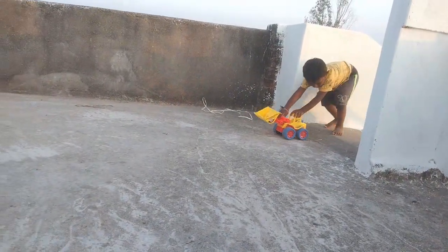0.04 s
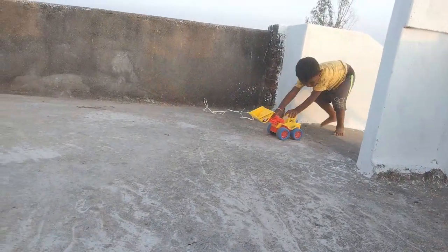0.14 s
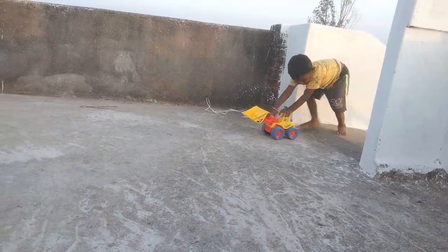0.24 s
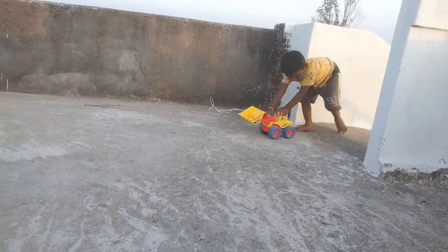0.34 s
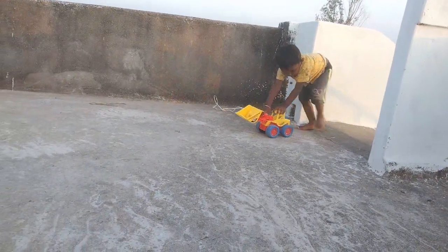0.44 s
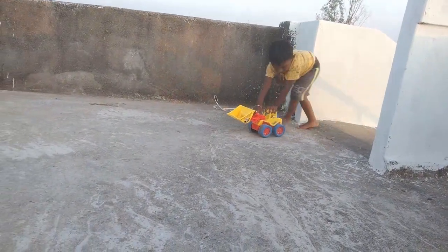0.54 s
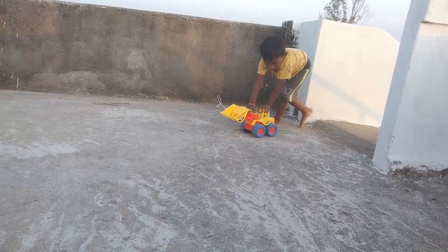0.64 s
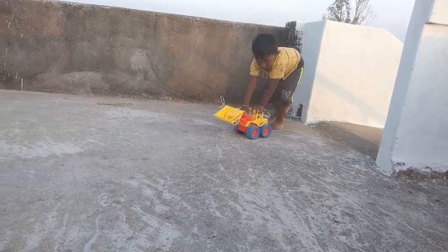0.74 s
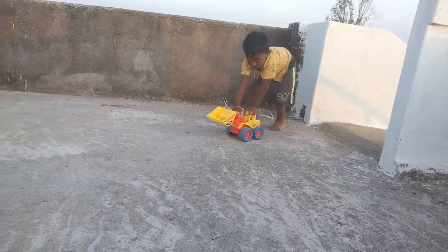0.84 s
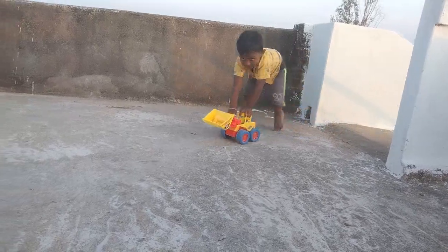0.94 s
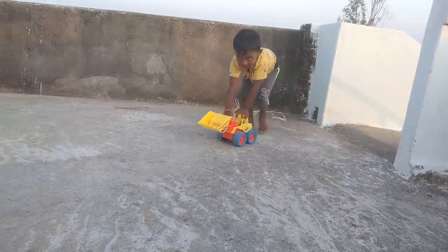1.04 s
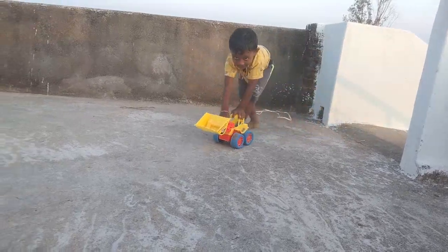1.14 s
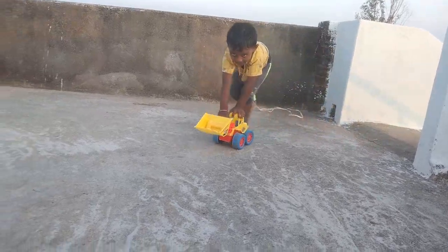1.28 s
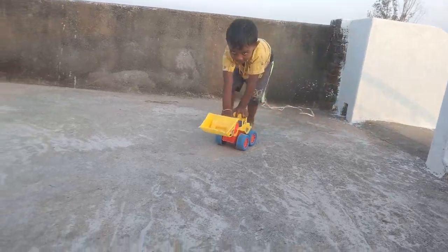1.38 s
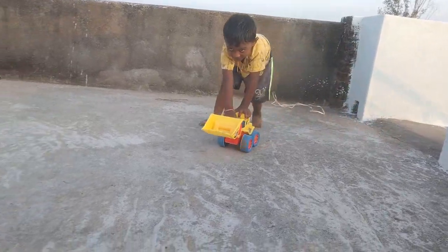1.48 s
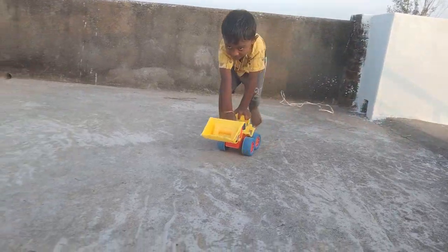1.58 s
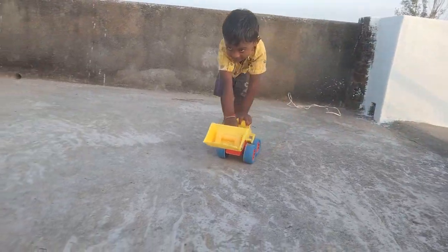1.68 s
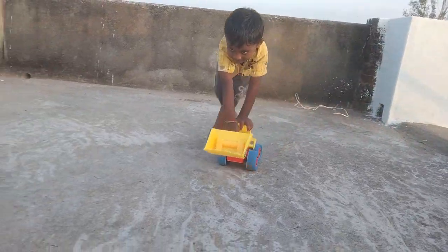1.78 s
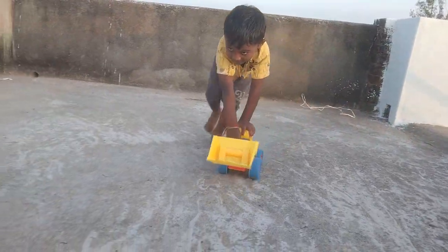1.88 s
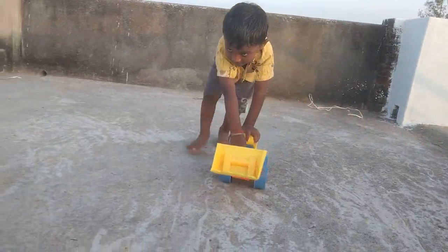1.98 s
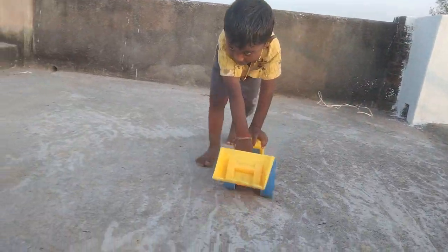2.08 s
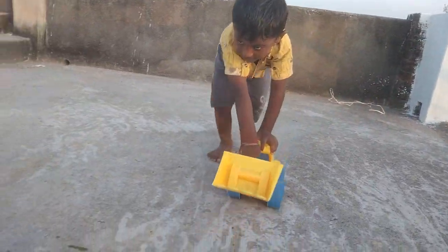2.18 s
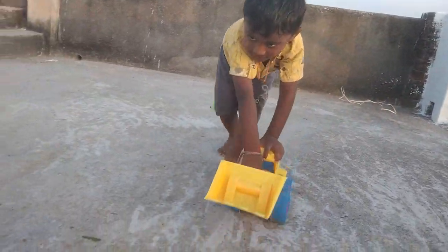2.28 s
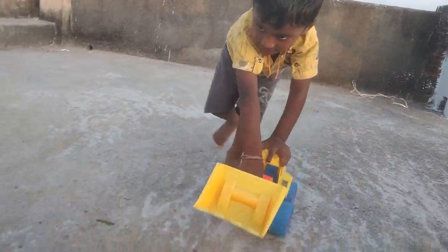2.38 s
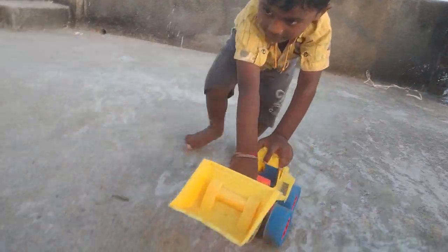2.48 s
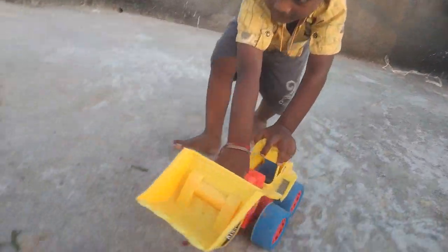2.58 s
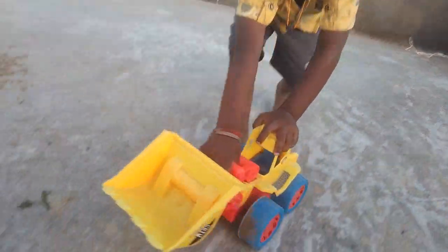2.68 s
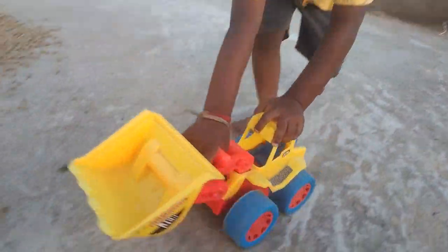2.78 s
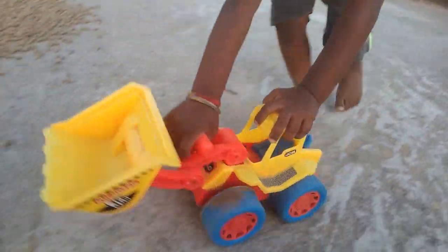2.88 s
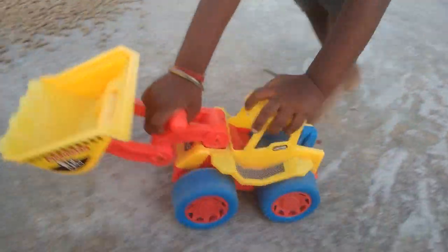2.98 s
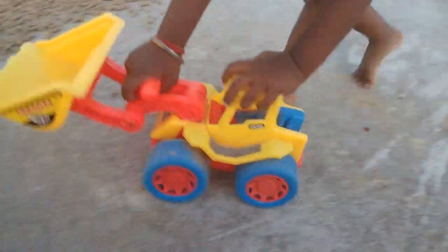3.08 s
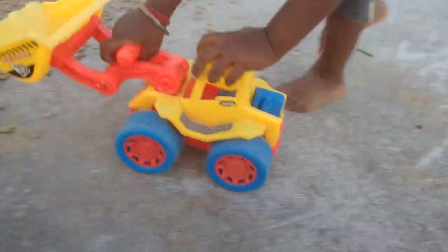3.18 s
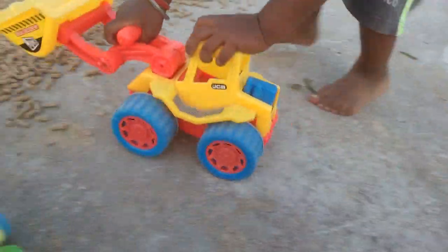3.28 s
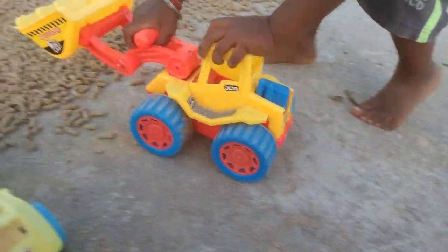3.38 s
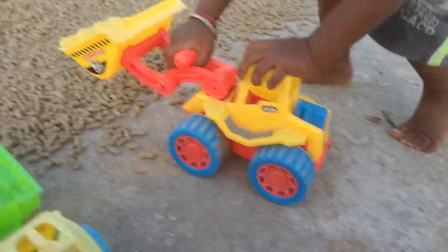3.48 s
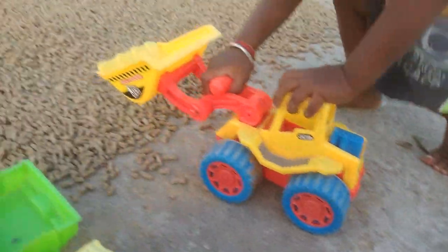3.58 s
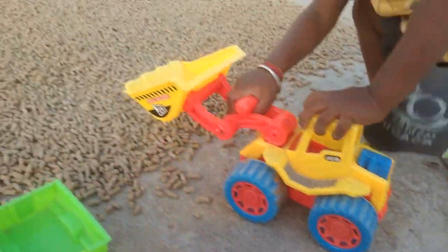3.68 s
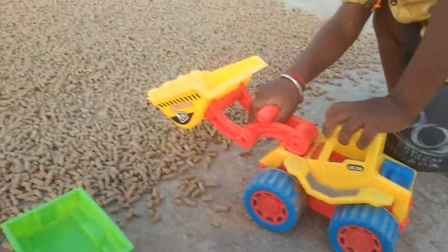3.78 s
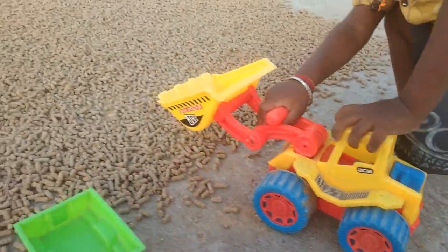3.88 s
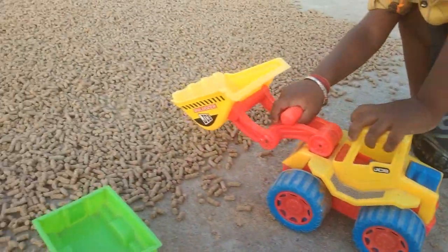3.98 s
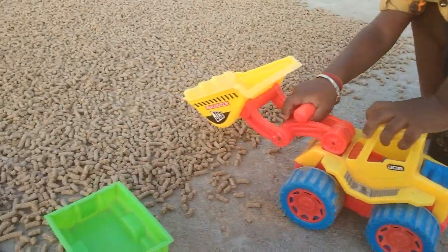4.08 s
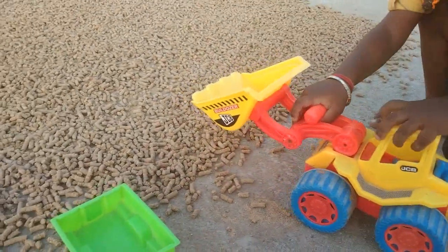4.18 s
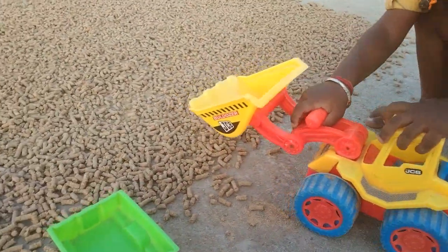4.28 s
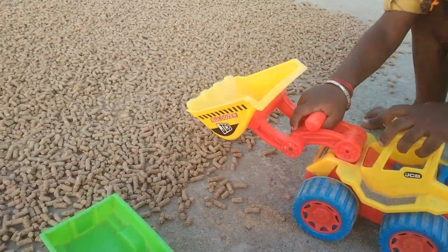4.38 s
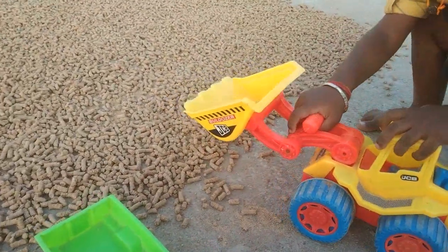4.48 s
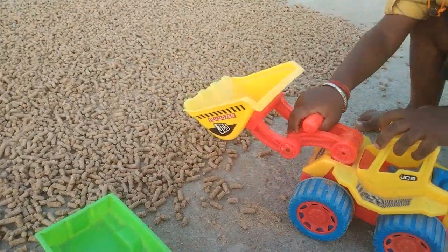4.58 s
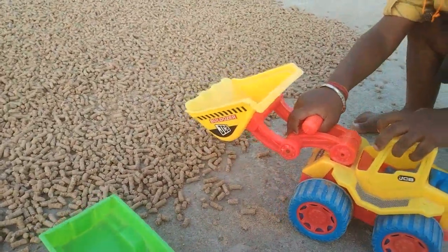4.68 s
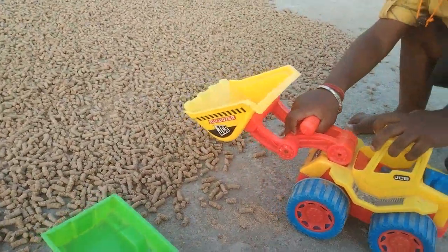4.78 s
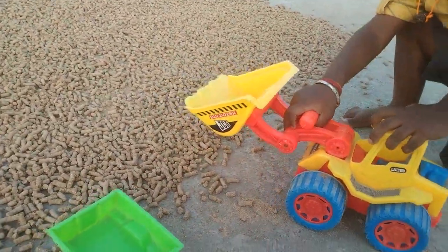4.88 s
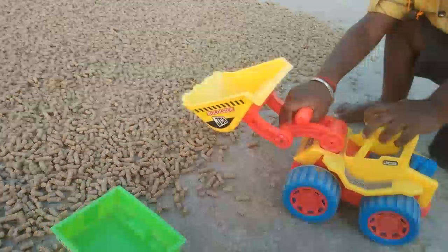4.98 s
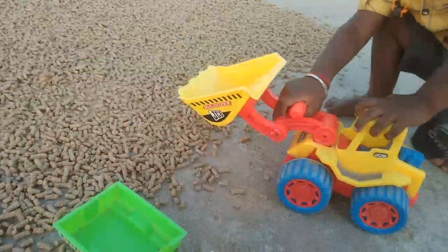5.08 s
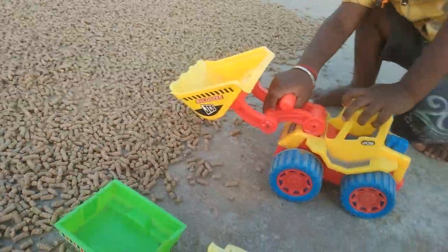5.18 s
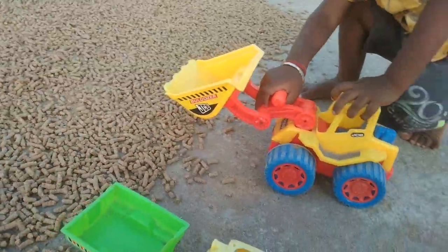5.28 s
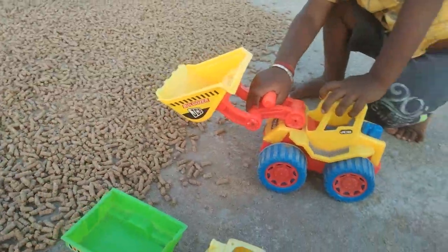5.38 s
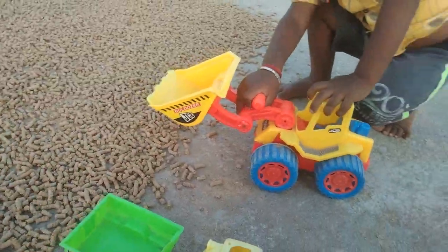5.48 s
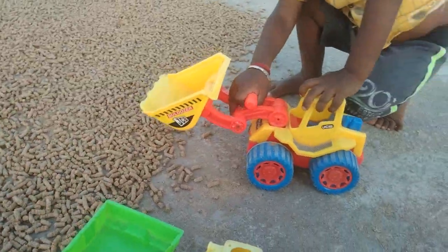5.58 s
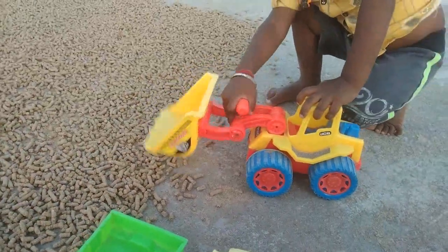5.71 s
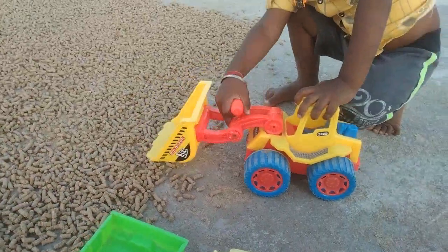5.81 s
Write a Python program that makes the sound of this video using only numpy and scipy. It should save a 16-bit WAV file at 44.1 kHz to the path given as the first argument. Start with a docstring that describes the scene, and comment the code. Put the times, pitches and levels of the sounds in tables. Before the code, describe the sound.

Clattering plastic wheels roll closer across gritty concrete, pass loudly and halt, leaving tiny clicks, sandy scrapes and a low distant rumble.

```python
"""Toy loader on rough concrete

A hollow plastic toy loader is pushed towards a phone on a roof terrace, stops, and creeps on among pellets.
Random bumps ring the modes of the hollow body; grit grains and axle rattles ring the thin wheel shells.
Placed bursts ring the same modes as ticks of joints and pellets and as dull body knocks.
Filtered noise makes sand scuffs and a low town rumble; stick-slip impulses make the bucket arm creak.
A short bounce off the ground and one weak wall echo set the toy on the terrace.
"""
import sys
import numpy as np
from scipy import signal
from scipy.fft import rfft, irfft
from scipy.io import wavfile
from scipy.ndimage import uniform_filter1d

SR = 44100
rng = np.random.default_rng(int(sys.argv[2]) if len(sys.argv) > 2 else 0)


def to_wav(sig):
    """Store sig (one row per channel, or 1-D mono) as 16-bit WAV at the path in sys.argv[1].

    Samples outside -1..1 are clipped; the rate is SR.
    """
    pcm = np.clip(np.atleast_2d(sig), -1, 1) * 32767
    pcm = np.round(pcm).astype(np.int16)
    wavfile.write(sys.argv[1], SR, pcm.T)  # frames by channels


N = 257713

# modes of the hollow body, seen from the front: mode_hz, width_hz, level_db, side_on_gain_db
BODY_MODES = [(143, 88, -17.5, 2.5), (327, 160, -12, 2), (439.5, 100, -3, 3.5), (525.6, 90, -3, 7),
              (601.3, 86.6, 6, -2.5), (691, 80, 4.5, -3), (773, 78, 3, -4), (862.3, 160, 1.5, -3),
              (1014, 170, -6.5, 6), (1278, 286, -3.5, 3), (1410, 78, -10, -5), (2140, 420, -18, 4.5)]
# modes of the thin wheel shells and panels, seen from the front: mode_hz, width_hz, level_db, side_on_gain_db
SHELL_MODES = [(2163, 1200, -1.5, 4.5), (2850, 250, 0, -2.5), (3190, 300, 0.5, 1.5), (3553, 358, 5, -4),
               (4037, 500, -1, 4), (4510, 420, 2, 0), (4960, 530, -5, 8), (5390, 310, 1.5, 1.5),
               (5770, 260, 1.5, -2), (6210, 910, -7, 3), (7520, 260, -6, 4.5), (8700, 110, -6.5, -2.5),
               (10570, 87, -19.5, 1)]
# the toy swings its front to the phone, then passes it broadside: time_s, side_on_share (0-1)
SIDE_ON = [(0, 0.28), (1.1, 0.76), (1.5, 0.49), (2.5, 0.09), (2.85, 0.8), (3.5, 0.97), (5.84, 0.84)]
# the toy rocks, rests and creeps on: time_s, body_rumble_db, scuffing_db
CREEP = [(3.5, -69, -67), (3.6, -69, -59.5), (3.83, -64.5, -62.5), (4.0, -68.5, -62.5), (4.15, -63, -68.5),
         (4.21, -55.5, -80), (4.36, -55.5, -66), (4.44, -63.5, -70), (4.55, -73.5, -74), (4.65, -77, -78.5),
         (4.75, -76, -80.5), (4.84, -71, -77), (4.9, -73, -70), (4.98, -70, -70.5), (5.03, -69, -61),
         (5.15, -63, -61.5), (5.3, -64.5, -56), (5.43, -60, -60.5), (5.65, -61, -69), (5.76, -55, -54.5),
         (5.842, -45, -55)]


def body(uneven, rattles):
    """Bumps in the concrete shake the hollow body; its modes take turns among three wheels' own bumps."""
    bumps_per_s, bump_spread_db = 1200, 0.9
    shared = unit(contacts(bumps_per_s, bump_spread_db)) + 1.1 * rattles
    wheels = []
    for _ in range(3):
        own = unit(contacts(bumps_per_s, bump_spread_db))
        wander_db = 2.3 * walk(50) + 1.6 * walk(4.935)
        wheels.append(undb(wander_db) * (shared + 0.8 * own))
    rung = ground(ring(wheels, BODY_MODES, 1.58, curve(SIDE_ON, column=1)))
    gain = rolling(column=1) + undb(curve(CREEP, column=1))
    return gain * unit(rung * undb(0.5 * uneven))


def grit(uneven, rattles):
    """Dense grains and sparser axle rattles ring the wheel shells, each panel in fits; fine dust hisses above."""
    # spectrum of the dust hiss: pitch_hz, relative_density_db (per Hz)
    dust_colour = [(4120, -27.5), (7000, -10.5), (9560, -18.5), (10800, -18.5), (11900, -25.5),
                   (14900, -19.5), (16000, -22)]
    grains_per_s, grain_spread_db = 2000, 1
    dust_db = -13.5  # against the shells, before the uneven ground moves it
    panels = []
    for _ in range(5):
        grains = unit(contacts(grains_per_s, grain_spread_db))
        wander_db = 2.0 * walk(70) + 2.0 * walk(6.14)
        panels.append(undb(wander_db) * (rattles + grains))
    rung = ground(ring(panels, SHELL_MODES, 3.0, curve(SIDE_ON, column=1)))
    shells = unit(rung * undb(0.8 * uneven))
    dust = unit(colour(rng.standard_normal(N) + 0.54 * rattles, dust_colour))
    return rolling(column=2) * (shells + undb(dust_db + 0.52 * uneven) * dust)


def rolling(column):
    """Gain of a rolling layer: its level, lifted on every ridge that the wheels lurch over."""
    # the toy rolls nearer, passes and brakes; levels between ridges: time_s, body_rumble_db, grit_hiss_db
    levels = [(0.0, -30.5, -37.5), (0.05, -27.5, -42), (0.12, -40, -40.5), (0.3, -40.5, -43.5),
              (0.64, -39.5, -45), (0.83, -36.5, -38), (1.04, -41, -36), (1.17, -31, -33.5),
              (1.25, -35, -36.5), (1.39, -35.5, -36.5), (1.44, -31, -36.5), (1.65, -32, -33),
              (1.89, -34, -33), (1.96, -31.5, -30.5), (2.11, -28, -32), (2.195, -34, -33.5),
              (2.25, -26, -31), (2.42, -26.5, -31.5), (2.684, -23, -25.5), (2.8, -27, -28),
              (2.9, -21.5, -25), (2.983, -17.5, -23), (3.03, -20, -24.5), (3.075, -18.5, -20),
              (3.1, -24, -25.5), (3.125, -22.5, -25), (3.173, -23, -26), (3.273, -20.5, -21.5),
              (3.352, -28.5, -25.5), (3.416, -28.5, -24), (3.51, -39, -43.5), (3.565, -58, -74),
              (3.64, -113, -90)]
    # ridges: start_s, body_rumble_gain_db, grit_hiss_gain_db, hold_s
    ridges = [(0.31, 5, 2, 0.028), (0.663, 7.5, 7.5, 0.032), (0.845, 6, 0, 0.11)]
    rise_s, fall_s = 0.012, 0.14
    t = np.arange(N) / SR
    lift_db = 0
    for row in ridges:
        corners_s = np.cumsum([0, rise_s, row[3], fall_s])
        lift_db = lift_db + row[column] * np.interp(t - row[0], corners_s, [0, 1, 1, 0])
    return undb(curve(levels, column=column) + lift_db)


def axle_rattles():
    """Loose axles knock at random; each knock chatters on as noise that dies away exponentially."""
    rattles_per_s, spread_db, rattle_db = 180, 3.5, -7
    chatter_s, chatter_db = 0.0058, -5  # decay time constant and level of the chatter
    hits = undb(rattle_db) * unit(contacts(rattles_per_s, spread_db))
    dying = signal.lfilter([1], [1, -np.exp(-1 / (chatter_s * SR))], np.abs(hits))
    return hits + undb(chatter_db) * unit(dying * rng.standard_normal(N))


def ticks():
    """Joints and pellets tick: small hard contacts ring the wheel shells."""
    # start_s, peak_db of the ringing modes, brightest_hz, edge_db (sharp edge against those modes)
    tick_list = [(0.0244, -16, 5070, -18), (0.0533, -21, 4960, -16), (0.138, -15, 7000, -7),
                 (0.186, -26, 4970, -11), (0.3246, -16, 4600, -10), (0.3453, -17, 4900, -15),
                 (0.372, -29, 2510, -18), (0.476, -43, 2800, -24), (0.504, -25.5, 7440, -5),
                 (0.597, -24, 7350, -7), (0.6539, -13.5, 5250, -11), (0.6842, -14, 3420, -21),
                 (0.6928, -14, 5530, -19), (0.7148, -14, 5030, -17), (0.7427, -17, 4580, -17),
                 (0.7592, -17, 4800, -12), (0.9655, -20, 6200, -14), (1.1485, -27, 3990, -23),
                 (1.2349, -3.5, 6560, -9.5), (1.2422, -7, 6000, -9), (1.2675, -15, 7500, -6),
                 (1.434, -19, 5470, -12), (1.5263, -24, 4700, -17), (1.5577, -30, 5830, -17),
                 (1.6315, -12.5, 5500, -19), (1.6631, -15, 5400, -16), (1.67, -25, 5450, -16),
                 (1.7029, -25, 4700, -17), (1.7448, -16, 4420, -17), (1.8327, -13.5, 5100, -19),
                 (1.939, -41, 5540, -17), (1.9474, -22.5, 3890, -32), (2.091, -17, 5100, -18),
                 (2.165, -21, 6000, -17), (2.291, -19, 6000, -15), (2.345, -24, 5700, -17),
                 (2.4191, -10.5, 4800, -13), (2.5435, -21, 5740, -17), (2.616, -13, 4500, -29),
                 (2.6852, -3, 5060, -14), (2.7569, 1.5, 5250, -16), (2.784, -16, 3700, -17),
                 (2.8448, -17, 6000, -12), (2.8669, -7.5, 4260, -17), (2.8872, -7, 4300, -19),
                 (2.9083, -9.5, 4470, -21), (2.94, -3, 4700, -24), (2.9746, -6, 5550, -22),
                 (2.9755, -5, 3220, -24), (2.994, -5, 4800, -18), (3.0094, -10, 4800, -23),
                 (3.0629, -1, 5600, -21), (3.0744, -9, 5100, -14), (3.1154, -2, 5460, -13),
                 (3.1252, -0.5, 5160, -11), (3.161, -15, 2160, -20), (3.249, -15, 5500, -18),
                 (3.2556, -10.5, 5950, -19), (3.2884, -10, 3920, -15), (3.3855, -14, 4700, -6),
                 (3.4178, -7, 4720, -11), (3.472, -11, 4960, -12), (3.5341, -18.5, 5130, -7),
                 (3.824, -53, 4470, -25), (3.842, -51, 5000, -12), (3.8593, -41, 5350, -1),
                 (3.8731, -24.5, 5300, -15), (3.8884, -38, 5800, -4), (3.9257, -36, 3880, -20),
                 (4.046, -61, 6950, -5), (4.11, -51, 6000, -11), (4.2054, -43, 5740, -17),
                 (4.2597, -42, 5500, -8), (4.2744, -54, 6500, -3), (4.2925, -28.5, 6440, -9),
                 (4.2973, -30, 4830, 3.5), (4.3104, -41, 5800, 4), (4.328, -37, 2820, -12),
                 (4.3854, -27.5, 4670, -8), (4.395, -24.5, 4530, -11), (4.4057, -40, 4770, -14),
                 (4.5138, -37.5, 6400, -3), (4.5264, -42.5, 6440, -4), (4.9008, -57, 5520, -14),
                 (4.9223, -55.5, 5000, -15), (4.9402, -49, 5500, -14), (5.005, -41, 5140, -17),
                 (5.013, -38, 4530, -19), (5.024, -44, 5090, -20.5), (5.0517, -34, 6340, -13),
                 (5.07, -42, 4970, -25), (5.3502, -39, 4450, -15), (5.4316, -41, 5740, -7),
                 (5.45, -34.5, 4430, -12), (5.4765, -35, 5200, -18), (5.5269, -42, 5600, -1),
                 (5.545, -36, 6400, -1), (5.5997, -47, 3540, -20), (5.675, -38.5, 5000, -11),
                 (5.698, -37, 6000, -35), (5.758, -43, 5090, -17), (5.7973, -31, 5900, -9),
                 (5.837, -22.5, 5370, -16)]
    return blows(tick_list, SHELL_MODES, width_share=0.39, noisy=0.35, t60=0.018)


def knocks():
    """Dull knocks ring the hollow body around one strongest pitch."""
    # start_s, peak_db, strongest_hz
    knock_list = [(0.056, -19.5, 716), (0.184, -39, 452), (0.327, -26, 780), (0.356, -26, 520),
                  (0.368, -29, 790), (0.391, -25.5, 600), (0.457, -36, 620), (0.559, -40, 604),
                  (0.693, -19, 590), (0.722, -19.5, 575), (0.761, -25.5, 590), (0.858, -25, 537),
                  (0.892, -21, 830), (1.02, -43, 900), (1.086, -18.5, 525), (1.148, -16.5, 1100),
                  (1.297, -39, 440), (1.332, -20, 580), (1.96, -18, 690), (2.095, -17, 680),
                  (2.12, -20, 720), (2.36, -16, 756), (2.682, -11.5, 646), (2.902, -18, 680),
                  (2.958, -23, 600), (2.98, -11.5, 640), (2.996, -8.5, 1000), (3.039, -7, 484),
                  (3.112, -7.5, 500), (3.159, -14, 617), (3.223, -12, 520), (3.256, -6.5, 990),
                  (3.282, -8, 640), (3.384, -11.5, 660), (3.47, -22.5, 685), (3.676, -44, 593),
                  (3.874, -39.5, 1040), (3.899, -37.5, 534), (3.926, -32, 530), (4.206, -32.5, 600),
                  (4.222, -43, 560), (4.247, -35.5, 550), (4.281, -35, 834), (4.328, -43, 550),
                  (4.444, -53, 500), (4.458, -56, 440), (4.461, -43, 201), (5.015, -42.5, 1418),
                  (5.05, -43.5, 1340), (5.35, -43, 1380), (5.797, -47.5, 645), (5.802, -42.5, 1590)]
    return blows(knock_list, BODY_MODES, width_share=0.98, noisy=0.6, t60=0.028)


def scuff():
    """Fine sand dragged slowly: a soft hiss with a slight crackle."""
    # spectrum of dragged sand: pitch_hz, relative_density_db (per Hz)
    sand_colour = [(880, -32), (1500, -6), (2190, -5), (2410, -12), (2880, -8), (3590, -8.5), (5830, -1),
                   (9470, -21), (13300, -23.5), (14900, -22.5), (16000, -33.5)]
    # short drags over the sand: loudest_s, level_db, half_length_s
    drags = [(3.725, -61, 0.054), (3.88, -68, .04), (4.205, -46.5, 0.025), (4.295, -47, 0.018),
             (4.4, -55, 0.033), (5.04, -79, 0.059), (5.283, -66, 0.12), (5.537, -50, 0.091),
             (5.7, -52, 0.034)]
    sand = rng.standard_normal(N) + 0.7 * unit(contacts(890, 3.0))
    gain = undb(curve(CREEP, column=2)) + swells(drags)
    return gain * undb(1.8 * walk(30)) * unit(colour(sand, sand_colour))


def creak():
    """Stick-slip in the bucket hinge rings two narrow modes of the arm, most the one nearest to each creak."""
    # modes of the arm: mode_hz, width_hz, level_db
    arm_modes = [(1374, 93, 1.5), (3300, 210, -4)]
    # creaks: loudest_s, level_db, half_length_s, strongest_hz
    creak_list = [(4.018, -73.5, 0.12, 3260), (4.081, -54, 0.024, 1380), (4.15, -63, 0.014, 1380),
                  (4.214, -44.5, 0.023, 1390), (4.299, -45.5, 0.01, 1360), (4.256, -58, 0.0092, 1400),
                  (4.334, -59, 0.015, 1390), (4.378, -58, 0.0091, 1360), (4.415, -64, 0.013, 1410)]
    slips = contacts(900, 1.6)
    out = np.zeros(N)
    for *swell, hz in creak_list:
        focused = band(slips, hz, 0.16 * hz)
        out += unit(ring([focused], arm_modes, 2.2)) * swells([swell])
    return out


def town():
    """Distant rumble: coloured noise that wavers a little, thin in the deep bass."""
    # spectrum of the rumble: pitch_hz, relative_density_db (per Hz)
    town_colour = [(15, -88.5), (25, -57.5), (76, -13), (108, -10), (170, -10), (217, -14), (320, -23.5),
                   (600, -35.5), (850, -52), (1400, -49.5), (2350, -48), (3400, -69), (5500, -52.5),
                   (9000, -73.5), (12000, -78), (16000, -74.5)]
    # the rumble dips briefly: time_s, gain_db
    lull = [(4.45, 0.), (4.65, -6), (4.95, -1)]
    level_db = -57  # before the lull and the wavering
    thin_bass = signal.butter(2, 65, "high", fs=SR, output="sos")
    rumble = signal.sosfilt(thin_bass, colour(rng.standard_normal(N), town_colour))
    return undb(level_db + curve(lull, column=1) + 1.2 * walk(3)) * unit(rumble)


def blows(table, modes, width_share, noisy, t60):
    """Each blow: a push and a dying chatter that ring the modes nearest to its pitch."""
    t = np.arange(2048) / SR
    chatter_fade = np.exp(-np.log(1000) * t / t60)  # falls 60 dB in t60 seconds
    out = np.zeros(N + len(t))
    for s, db, hz, *edge_db in table:
        burst = noisy * rng.standard_normal(len(t)) * chatter_fade
        burst[0] += 3.0  # the push
        side_on = np.interp(s, *np.transpose(SIDE_ON))
        rung = ring([band(burst, hz, width_share * hz)], modes, 4.0, side_on)
        rung = rung / np.abs(rung).max()
        if edge_db:  # hard contacts carry a broad bright edge above the modes
            edge = band(band(burst, 9700, 8100), 9700, 8100)
            rung = rung + undb(edge_db[0]) * edge / np.abs(edge).max()
        i = int(s * SR)
        out[i:i + len(t)] += undb(db) * rung
    return out[:N]


def ring(x, modes, shelf, side_on=0.):
    """Sum of resonances, each applied twice so the valleys stay dark; side-on gains shift their levels."""
    out = 0
    for k, (hz, width, db, *side_db) in enumerate(modes):
        push = x[k % len(x)]  # the modes take the signals in turn
        tone = band(band(push, hz, width), hz, shelf * width)
        out = out + undb(db + side_on * sum(side_db)) * tone
    return out


def band(x, hz, width):
    """One resonance, gain 1 at its centre."""
    return signal.lfilter(*signal.iirpeak(min(hz, .45 * SR), hz / width, fs=SR), x)


def contacts(per_s, spread_db):
    """Random contact impulses of either sign, most small, a few large."""
    where, size, sign = rng.random(N), rng.exponential(size=N), rng.standard_normal(N)
    return (where < per_s / SR) * undb(spread_db * np.minimum(size, 3.5)) * sign


def walk(rate):
    """Random levels, one every 1 / rate s, joined by ramps, without slow drift; rms 1."""
    k = int(SR / rate)
    steps = np.repeat(rng.standard_normal(N // 50), k)[:N]
    ramps = uniform_filter1d(steps, k)
    return unit(ramps - uniform_filter1d(ramps, 5 * k))


def colour(x, points):
    """Causal minimum-phase filter with the given (Hz, dB) spectrum."""
    hz, db = np.transpose(points)
    f = np.linspace(1, SR / 2, 4097)
    cep = irfft(np.interp(np.log(f), np.log(hz), db) * np.log(10) / 20)
    # folding the cepstrum onto positive time makes the filter causal
    cep[1:4096] *= 2
    cep[4097:] = 0
    impulse = irfft(np.exp(rfft(cep)))[:4096]
    return signal.fftconvolve(x, impulse)[:len(x)]


def swells(table):
    """Gain that rises to each row's middle and falls again, straight in dB."""
    edge_db = 15  # fall from the middle to the half length
    t = np.arange(N) / SR
    return sum(undb(db - edge_db * np.abs(t - s) / half) for s, db, half in table)


def curve(table, column):
    """One column of a table at every sample."""
    table = np.array(table)
    return np.interp(np.arange(N) / SR, table[:, 0], table[:, column])


def ground(x):
    """Direct sound plus its bounce off the concrete, which darkens it near 2.7 and 8 kHz."""
    return x + 0.55 * late(x, 0.000186)


def late(x, s):
    """The sound s seconds later."""
    n = np.arange(len(x))
    return np.interp(n - s * SR, n, x, left=0)


def undb(db):
    """Decibels to linear gain."""
    return 10 ** (np.asarray(db) / 20)


def unit(x):
    """Scale to rms 1."""
    return x / np.sqrt(np.mean(x ** 2))


def scene():
    """The toy with its wall echo, over the town."""
    uneven = walk(29.81)  # rough patches jolt body and treads together
    rattles = axle_rattles()
    toy = body(uneven, rattles) + grit(uneven, rattles)
    toy = toy + ticks() + knocks() + scuff() + creak()
    wall_s, wall_db = 0.014, -16.5  # the terrace wall sends back one weak echo
    toy = toy + undb(wall_db) * late(toy, wall_s)
    return (toy + town())[None]


def record(dry):
    """The phone drops the deep bass, rounds the loudest peaks, dulls above its top and cuts the rest."""
    mic_top_hz, top_hz = 15500, 16800
    bass_cut = signal.butter(2, 45, "high", fs=SR, output="sos")
    dulling = signal.ellip(8, .2, 24, mic_top_hz, fs=SR, output="sos")
    top_cut = signal.ellip(10, .2, 80, top_hz, fs=SR, output="sos")
    thin = signal.sosfilt(bass_cut, dry)
    rounded = np.tanh(.75 * thin) / .75
    dull = signal.sosfilt(dulling, rounded)
    return signal.sosfilt(top_cut, dull)


dry = scene()
out = record(dry)
to_wav(out)
```